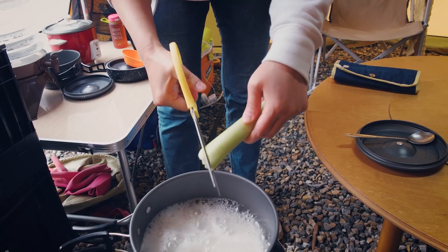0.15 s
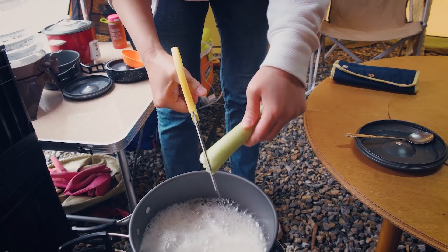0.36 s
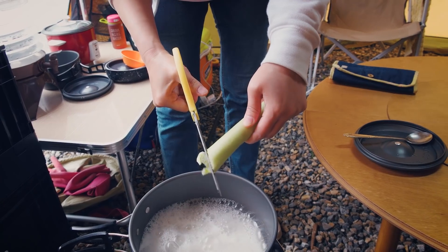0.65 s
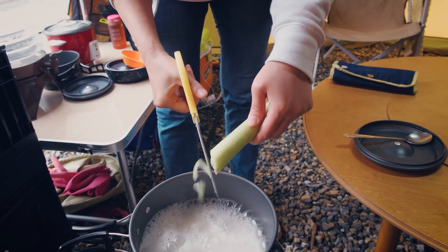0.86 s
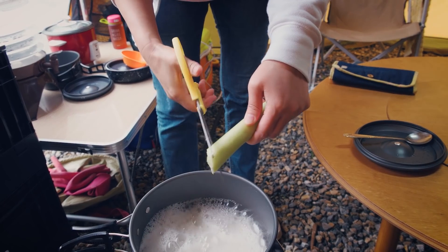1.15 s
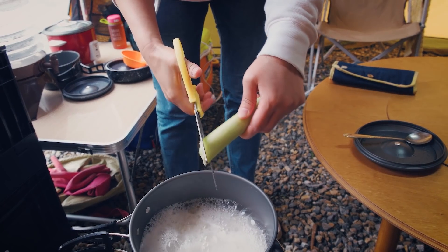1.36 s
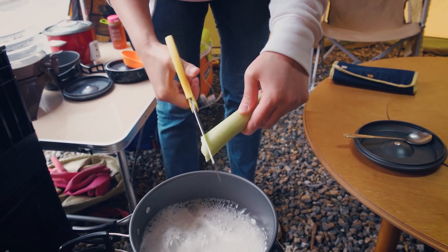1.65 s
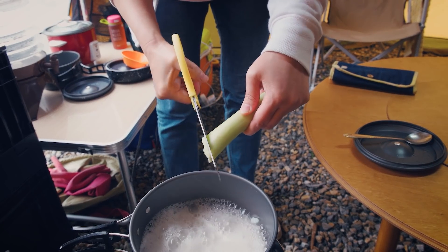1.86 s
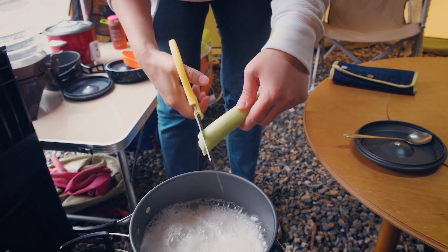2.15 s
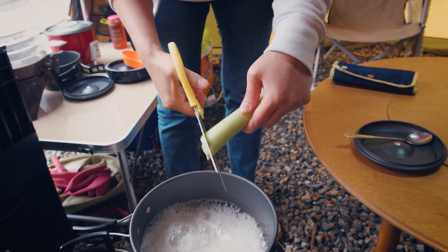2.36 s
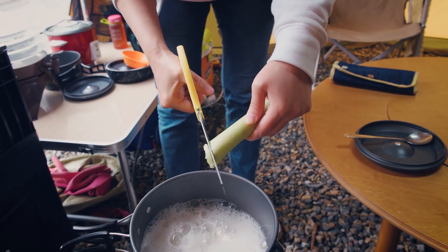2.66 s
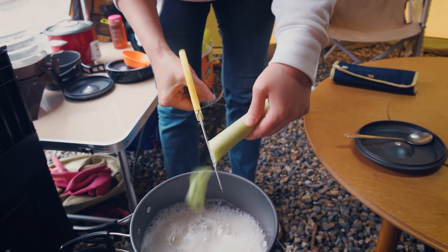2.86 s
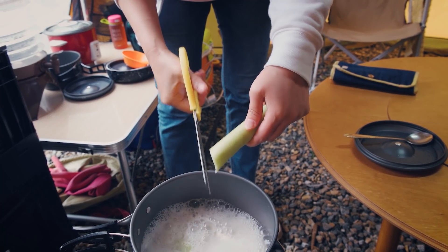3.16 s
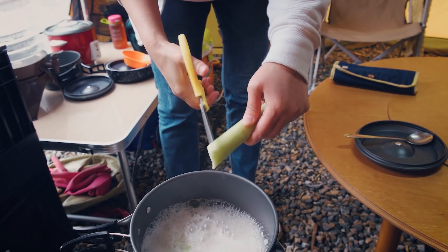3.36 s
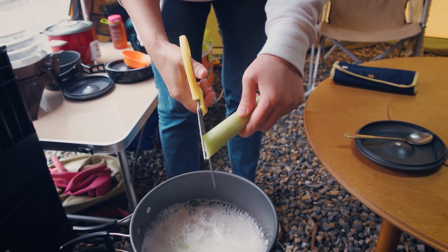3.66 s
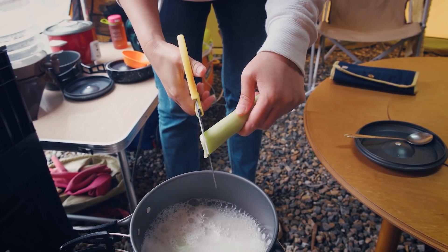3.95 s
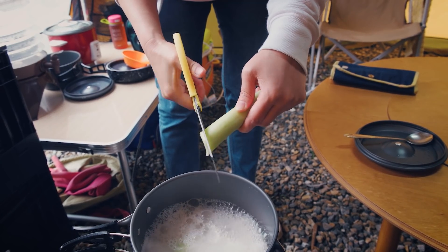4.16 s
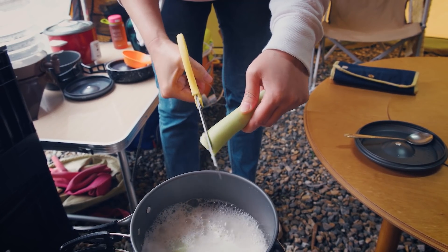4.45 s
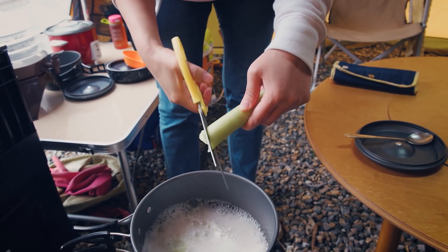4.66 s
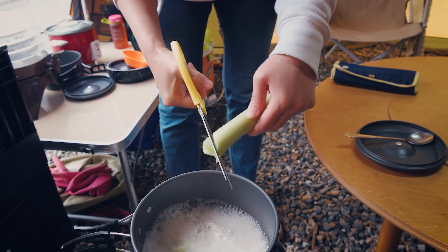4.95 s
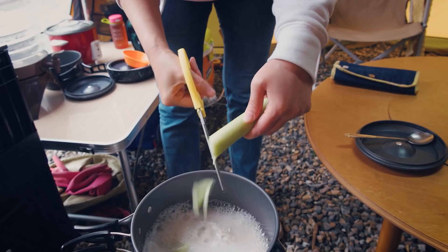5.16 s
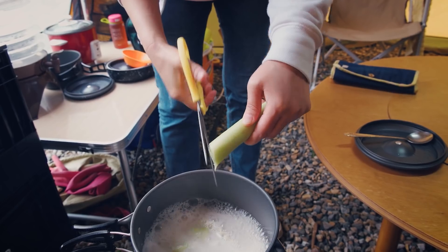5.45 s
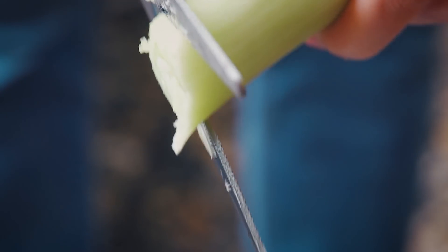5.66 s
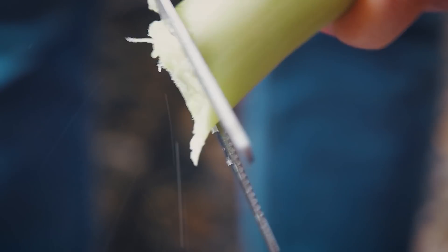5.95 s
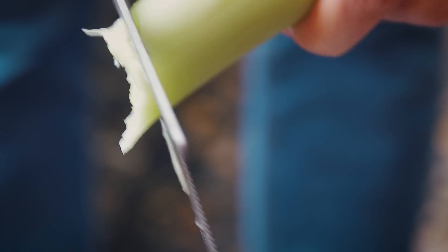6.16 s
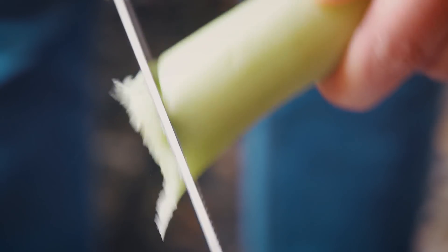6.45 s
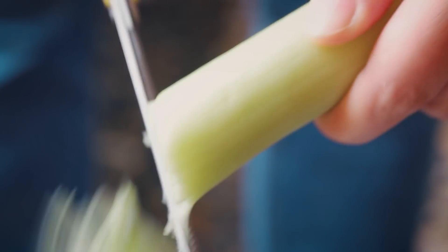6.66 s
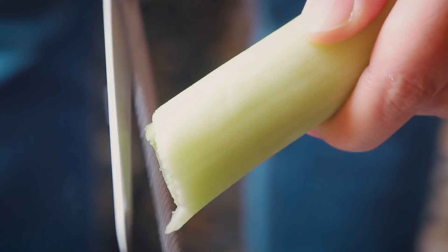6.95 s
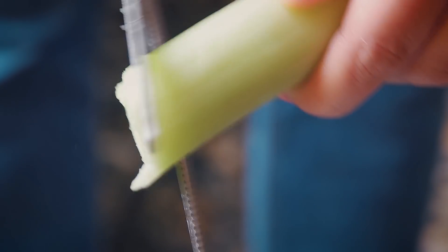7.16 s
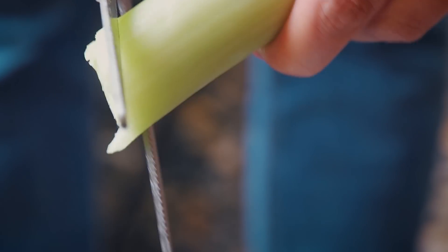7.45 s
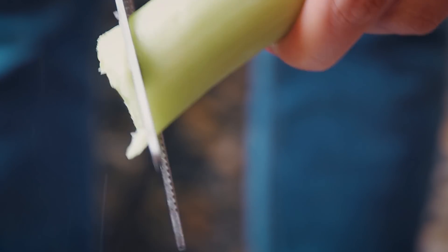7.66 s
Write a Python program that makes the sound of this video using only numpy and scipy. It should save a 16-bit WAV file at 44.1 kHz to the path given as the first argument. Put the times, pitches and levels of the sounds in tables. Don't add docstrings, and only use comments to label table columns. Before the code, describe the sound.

Outdoors, a portable gas burner roars continuously, low and fluttering with a mid-range ringing hiss. Close to the microphone, scissors cut a wet stalk in irregular groups: soft juicy crunches, crisp tearing fibres and hard woody snaps. Flame pops dot the gaps, low bumps nudge the microphone stand, and the roar dips briefly after the loudest snaps.

```python
import sys
import numpy as np
from scipy import signal
from scipy.fft import rfft, irfft, next_fast_len
from scipy.io import wavfile
from scipy.ndimage import uniform_filter1d, map_coordinates

SR = 44100
rng = np.random.default_rng(int(sys.argv[2]) if len(sys.argv) > 2 else 0)


def boost(x):
    u = np.asarray(x, float) / 20
    return 10 ** u


def unload_audio(sound):
    columns = np.transpose(np.atleast_2d(sound))
    steps = np.round(np.clip(columns, -1, 1) * 32767)
    wavfile.write(sys.argv[1], SR, steps.astype(np.int16))


N = 343539

# (time [s], level [dB])
GAS_FLOW = [(0, 0.2), (.7, 0.7), (1.3, 0.5), (1.9, 0), (2.5, 1.3), (3, -0.1), (3.5, 0.5), (4, 1), (4.6, 1),
            (5.1, 1.5), (5.6, -0.1), (6.2, 1.3), (6.7, 0.9), (7.2, 1.1), (7.8, -1)]
# (frequency [Hz], level [dB])
FLAME_SPECTRUM = [(25, -39), (60, 2), (150, 5.5), (200, 3), (240, -5.5), (330, -2), (490, 1.5), (600, -4.5),
                  (665, -11.5), (720, -3.5), (860, -3), (1030, -18), (1700, -25.5), (4000, -53)]
# (frequency [Hz], width [Hz], level [dB])
HEAD_RESONANCES = [(1430, 230, -4), (1600, 190, 0), (2160, 140, 1.5), (2503, 65, 0), (2820, 95, -5.5),
                   (3030, 140, 0), (3170, 160, -8)]
# (frequency [Hz], width [Hz], level [dB])
JET_RESONANCES = [(4000, 400, -5), (4680, 220, -1), (4960, 150, 0), (5310, 200, -3), (6060, 130, -9),
                  (7170, 300, -9), (7550, 300, -8.5), (8000, 300, -11), (8800, 600, -14), (10500, 400, -19),
                  (11800, 330, -17.5), (14200, 300, -25)]
# (frequency [Hz], level [dB])
HISS_SPECTRUM = [(600, 5), (1100, -1.5), (1900, 3), (2700, 1), (3400, -5), (4300, -10.5), (6500, -13.5),
                 (9500, -19), (12300, -23.5), (15800, -31)]
# (middle [s], length [s], frequency [Hz], level [dB])
STAND_BUMPS = [(0.054, 0.18, 73.4, -20), (0.391, 0.075, 73, -13.5), (0.681, 0.075, 67, -7),
               (0.758, 0.095, 75, -21), (1.208, .05, 69.5, -24), (1.385, 0.087, 75, -21.5),
               (5.239, 0.083, 71.6, -14.5), (5.485, 0.051, 72, -17.5), (5.534, 0.069, 60.6, -12.5),
               (5.66, 0.043, 80, -26), (5.705, 0.037, 76, -20.5), (5.779, 0.13, 75, -25.5)]
# (start [s], end [s], level [dB])
BLADE_STROKES = [(0, 0.076, -35.5), (0.077, 0.242, -38.5), (0.51, 0.545, -31), (.69, .785, -33.5),
                 (1.627, 1.813, -43), (1.762, 1.922, -37.5), (1.907, 1.98, -42), (2.355, 2.457, -37),
                 (2.43, 2.553, -36.5), (2.623, 2.755, -35), (2.74, 2.916, -39), (2.89, 2.943, -34),
                 (4.217, 4.32, -39), (4.287, 4.375, -36), (4.36, 4.482, -40), (4.816, 4.93, -42),
                 (4.903, 5, -35), (4.965, 5.11, -41), (5.122, 5.173, -28.5), (5.78, 5.906, -36.5),
                 (5.887, 5.98, -42), (5.975, 6.005, -39), (6.368, 6.466, -38), (6.442, 6.564, -31),
                 (6.538, 6.65, -37), (6.636, 6.685, -32), (6.682, 6.721, -25.5), (7.51, 7.602, -35.5),
                 (7.583, 7.66, -33), (7.642, 7.797, -37.5)]
# (frequency [Hz], level [dB])
CRUNCH_SPECTRUM = [(600, -43), (1200, 9), (2500, 9.5), (4500, 1), (7000, -4), (11000, -6.5), (15500, -11)]
# (frequency [Hz], level [dB])
TEAR_SPECTRUM = [(1200, -26), (3000, 7), (4500, 0.5), (7000, 0.5), (11000, -8.5), (15500, -12.5)]
# (time [s], level [dB])
LONE_TEARS = [(.0079, -31), (.0822, -29.5), (.1426, -34), (.7072, -30), (.7222, -31), (.7368, -30),
              (1.0707, -32), (1.7824, -30), (1.843, -26.5), (1.972, -28), (2.3636, -26), (2.435, -24),
              (2.8518, -22), (2.8573, -26), (4.2903, -24), (4.3102, -21), (4.418, -23), (4.9559, -21),
              (5.1274, -16), (5.1337, -21), (5.2911, -30), (5.8946, -27), (5.9122, -22), (6.401, -21.5),
              (6.4559, -25), (6.4957, -16), (6.5144, -23), (6.5887, -27.5), (7.6587, -20), (7.7383, -22.5)]
# (time [s], jolt level [dB], jolt frequency [Hz], tear level [dB])
BLADE_SNAPS = [(0.0211, 1.5, 1660, -9), (0.1855, -3.5, 1920, -19), (.5305, -11, 2020, -22),
               (.754, -1.5, 1740, -14.5), (1.7672, -11, 2050, -20), (1.911, -1, 1870, -11.5),
               (1.9206, -2.2, 1630, -12), (2.4085, -5, 1680, -20), (2.4152, -3.5, 1740, -17.5),
               (2.4617, -5.5, 1840, -16.5), (2.667, -7, 2070, -15.5), (2.9133, -1.5, 1630, -9.5),
               (4.2534, -7.5, 1960, -23), (4.3265, -1.7, 1550, -13.5), (4.348, -5.5, 2650, -28),
               (4.3598, -8.5, 1780, -20), (4.4128, -5.5, 1740, -26), (4.4358, -7, 1840, -22.5),
               (4.9165, -7.5, 2370, -26), (4.9325, -4, 1670, -20.5), (5.1392, -12, 2400, -17),
               (5.86, -6.5, 2320, -14.5), (5.929, 1.5, 2350, -12.5), (5.9852, -1, 2450, -16.5),
               (6.657, -4, 2670, -20), (6.706, -16, 2500, -16), (7.5285, -7.5, 1720, -24),
               (7.6093, -2.5, 3100, -9.5), (7.6128, 3, 2460, -25)]
# (time [s], jolt level [dB], jolt frequency [Hz])
BLADE_SLIPS = [(.5095, -9, 1900), (1.7543, -10, 2170), (1.899, -10, 2410), (2.404, -9, 1720),
               (2.4685, -8, 1600), (2.495, -15, 2480), (2.911, -11, 1680), (2.9283, -9, 1720),
               (4.2827, -15, 1700), (4.324, -8, 2560), (5.0137, -12.5, 2500), (5.0468, -9, 1650),
               (5.148, -8, 2820), (5.1553, -7.5, 1820), (5.8208, -13, 2240), (5.878, -14, 2130),
               (6.437, -11, 2560), (6.477, -15, 2860), (6.4823, -12, 2900), (6.487, -8.5, 2410),
               (4.258, -12, 2200), (7.546, -15, 2200), (7.5974, -10, 2240), (7.6183, -9, 1940),
               (7.6698, -12, 2800), (7.674, -9, 1960), (4.3271, -12, 960), (5.208, -19, 3300),
               (5.932, -6.5, 900), (7.61, -8, 1520)]
# (time [s], gain change [dB])
GAIN_DUCKS = [(.03, -11), (.19, -3.5), (.7, -4.5), (1.92, -9.5), (2.46, -4.5), (2.92, 2.5), (4.33, -10.5),
              (4.435, -3), (5.16, 0), (5.93, -8), (5.99, -7), (7.615, -7.5)]
# (time [s], level [dB], frequency [Hz])
FLAME_POPS = [(.6971, -9, 1600), (.9545, -10, 1600), (1.2916, -12, 1200), (3.4594, -12, 1500),
              (3.4612, -12, 1500), (3.4708, -8, 1500), (3.7543, -7, 1400), (3.7556, -9, 900),
              (3.7575, -5, 1450), (3.7629, -5, 950), (3.9054, -14, 1400), (4.521, -14, 1200),
              (4.564, -14, 1200), (5.8685, -13, 1400), (6.2522, -8, 1500), (6.3764, -12, 1300),
              (6.692, -9, 900), (7.1883, -7, 1400), (7.332, -12, 800), (7.4494, -5, 1600)]

CHATTER_S = .0013
TEAR_LEAD_S = .0004


def unit(x):
    return x / np.sqrt(np.mean(x ** 2) + 1e-20)


def along(points, hz):
    f, v = np.transpose(points)
    return np.interp(np.log(hz + 1), np.log(f + 1), v)


def wobble(rate):
    knots = rng.standard_normal(int(N * rate / SR) + 4)
    return map_coordinates(knots, [np.arange(N) * rate / SR])


def noise():
    return rng.standard_normal(N)


def grains(rate, spread_db):
    size_db = spread_db * np.minimum(rng.exponential(size=N), 4.5)
    return (rng.random(N) < rate / SR) * boost(size_db)


def filtered(x, response):
    m = next_fast_len(N + SR // 2)
    return irfft(rfft(x, m) * response(np.fft.rfftfreq(m, 1 / SR)), m)[:N]


def shaped(x, spectrum):
    return filtered(x, lambda hz: boost(along(spectrum, hz)))


def resonances(table):
    def response(f):
        power = 0
        for c, width, db in table:
            power = power + boost(2 * db) / (1 + ((c * c - f * f) / (c * width)) ** 2) ** 2
        return np.sqrt(power)
    return response


def causal(spectrum, size=8192):
    cepstrum = irfft(np.log(boost(along(spectrum, np.fft.rfftfreq(size, 1 / SR)))))
    cepstrum[1:size // 2] *= 2
    cepstrum[size // 2 + 1:] = 0
    return irfft(np.exp(rfft(cepstrum)))


def patchy(x, depth_db):
    z = signal.stft(x, nperseg=512)[2]
    field = uniform_filter1d(rng.standard_normal(z.shape), size=6, axis=0)
    field = uniform_filter1d(field, size=60, axis=1)
    return signal.istft(z * boost(depth_db * unit(field)), nperseg=512)[1][:N]


def nearby(x, db):
    t = np.arange(SR // 20) / SR
    scatter = rng.standard_normal(len(t)) * boost(-60 * t / 0.02) * (t > .0015)
    return x + boost(db) * signal.fftconvolve(x, scatter / np.linalg.norm(scatter))[:N]


def burner():
    bursts = boost(1.8 * wobble(40) + .6 * wobble(7))
    puffs = unit(grains(520, spread_db=2.9) * bursts) + .8 * noise()
    flame = unit(signal.fftconvolve(puffs - puffs.mean(), causal(FLAME_SPECTRUM))[:N])

    head_shake = noise() * boost(2.18 * wobble(110) + 1.0 * wobble(25))
    head = unit(filtered(head_shake, resonances(HEAD_RESONANCES)))
    jet_shake = noise() * boost(1.2 * wobble(150))
    jet = unit(patchy(filtered(jet_shake, resonances(JET_RESONANCES)), depth_db=1.6))
    hiss = unit(shaped(noise() * boost(0.89 * wobble(60)), HISS_SPECTRUM))

    flow_db = np.interp(np.arange(N) / SR, *np.transpose(GAS_FLOW))
    head_db = 1.5 + 0.57 * flow_db
    turbulence = boost(-31.5) * head + boost(-46.0) * jet + boost(-35.5) * hiss
    return boost(-27.0 + flow_db) * flame + boost(head_db) * turbulence


def bumps():
    t, out = np.arange(N) / SR, np.zeros(N)
    for middle, length, hz, db in STAND_BUMPS:
        swell = np.cos(np.pi * np.clip((t - middle) / length, -.5, .5)) ** 2
        out += boost(db) * swell * np.cos(2 * np.pi * hz * (t - middle))
    return out


def pressure():
    t, out = np.arange(N) / SR, np.zeros(N)
    for start, end, db in BLADE_STROKES:
        progress = np.clip((t - start) / (end - start), 0, 1)
        out += boost(db) * np.sin(np.pi * progress) ** 0.95
    return out


def shearing():
    bursts = signal.lfilter([1], [1, -.9], grains(900, spread_db=4.2))
    cells = unit(bursts) + .65
    return pressure() * boost(3.5) * unit(shaped(cells * noise(), CRUNCH_SPECTRUM))


def fibres():
    at = np.flatnonzero(rng.random(N) < 90 / SR)
    loose_db = 20 * np.log10(pressure()[at] + 1e-6) + 5 + 4 * rng.standard_normal(len(at))
    tears = LONE_TEARS + list(zip(at / SR, loose_db))
    for s, _, _, tear_db in BLADE_SNAPS:
        tears = tears + [(s - TEAR_LEAD_S, tear_db), (s + 1.5 * CHATTER_S, tear_db - 6)]
    return tears + [(s - TEAR_LEAD_S, db - 11.5) for s, db, _ in BLADE_SLIPS]


def cracks():
    dull, bright, t = np.zeros(N + SR), np.zeros(N + SR), np.arange(SR // 100) / SR
    life = boost(-60 * t / .0065) * (1 - np.exp(-t / .0004))
    for s, db in fibres():
        treble_db = -8 + 2.2 * rng.standard_normal()
        burst = boost(db + 8.5) * life * rng.standard_normal(len(t))
        start = round(s * SR)
        dull[start:][:len(t)] += burst
        bright[start:][:len(t)] += boost(treble_db + 10.0) * burst

    def high(hz):
        return 1 / (1 + (9000 / (hz + 1)) ** 8)

    low_part = filtered(dull[:N], lambda hz: 1 - high(hz))
    high_part = filtered(bright[:N], high)
    return nearby(shaped(low_part + high_part, TEAR_SPECTRUM), db=-4.5)


def jolts():
    found = list(BLADE_SLIPS)
    for s, db, hz, _ in BLADE_SNAPS:
        found.append((s, db, hz))
        for k in (1, 2, 3):
            a, b, c = rng.standard_normal(3)
            late = CHATTER_S * (k + .3 * np.tanh(a))
            found.append((s + late, db - 5 * k + 1.5 * b, hz * np.exp(0.21 * c)))
    return found


def knocks():
    out, t = np.zeros(N + SR), np.arange(SR // 100) / SR
    for s, db, hz in jolts():
        life = boost(db + 1 - 60 * t / 0.0057) * (1 - np.exp(-t / 0.000096))
        ring = np.sin(2 * np.pi * hz * t) + 0.22 * np.sin(2.9 * np.pi * hz * t)
        out[round(s * SR):][:len(t)] += life * ring
    return nearby(out[:N], db=-7.5)


def ducking():
    t, gain_db = np.arange(N) / SR, np.zeros(N)
    for s, db in GAIN_DUCKS:
        after = np.maximum(t - s, 0)
        gain_db += db * 1.89 * (1 - np.exp(-after / 0.055)) * np.exp(-after / 0.088)
    return boost(gain_db)


def pops():
    out, t = np.zeros(N + SR), np.arange(-80, 120) / SR
    for s, db, hz in FLAME_POPS:
        push = np.exp(-(t * hz / .6) ** 2) * (.3 + .7 * np.cos(2 * np.pi * hz * t))
        out[round(s * SR) - 80:][:len(t)] += boost(db) * push
    return nearby(out[:N], db=-9)


def scene():
    cutting = shearing() + cracks() + knocks()
    return (ducking() * burner() + bumps() + cutting + pops())[None]


def roll_off(x):
    return signal.sosfilt(signal.butter(12, 16440, fs=SR, output="sos"), x)


def record(dry):
    x = filtered(dry[0], lambda hz: np.clip((15770 - hz) / 100, .003, 1))
    x = x / (1 + np.abs(x) ** 12) ** (1 / 12)
    return roll_off(x[None])


dry = scene()
out = record(dry)
unload_audio(out)
```